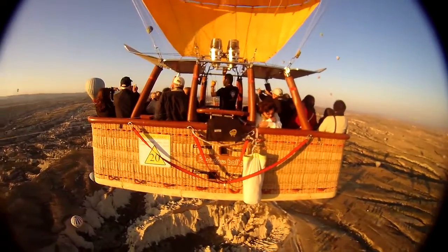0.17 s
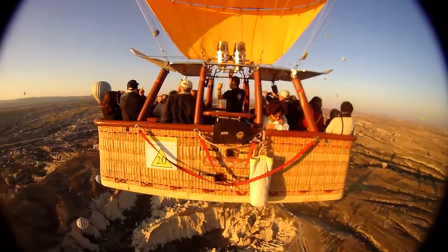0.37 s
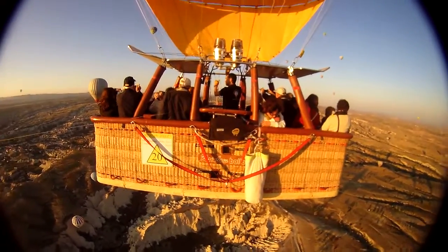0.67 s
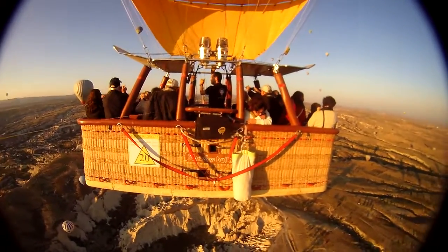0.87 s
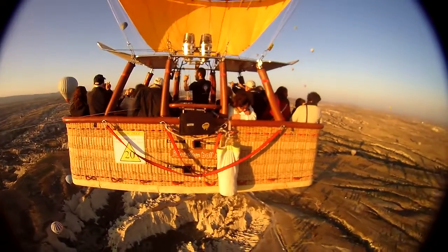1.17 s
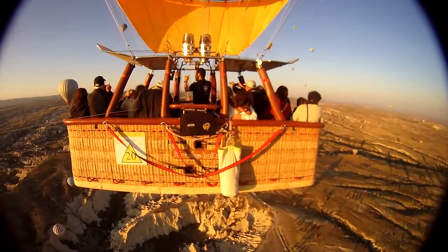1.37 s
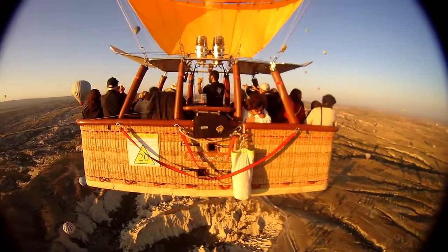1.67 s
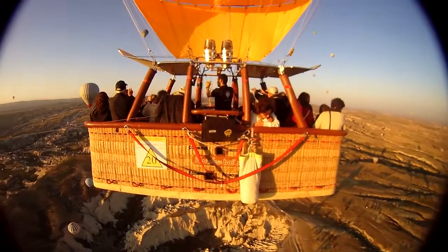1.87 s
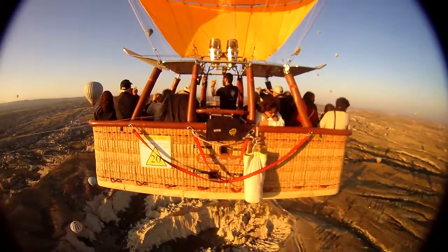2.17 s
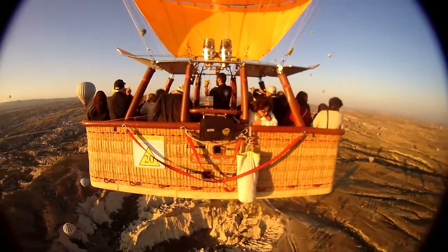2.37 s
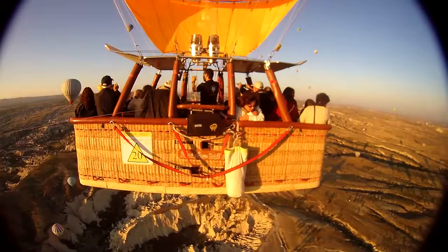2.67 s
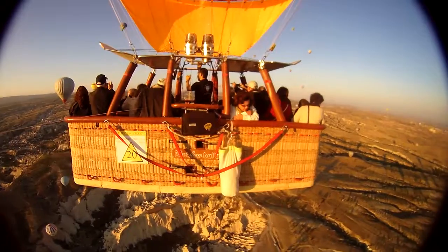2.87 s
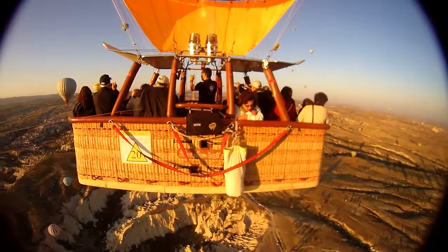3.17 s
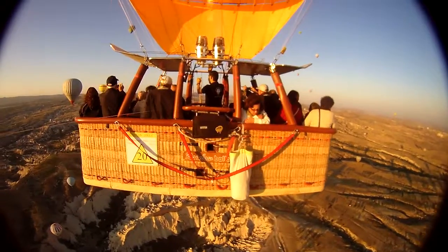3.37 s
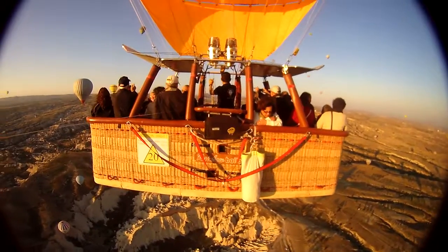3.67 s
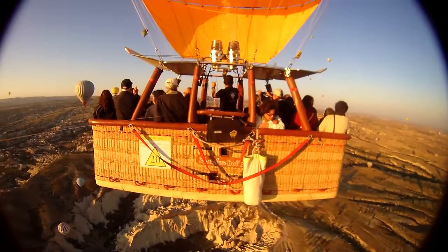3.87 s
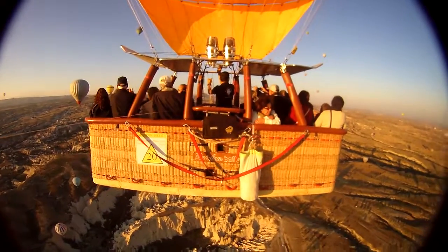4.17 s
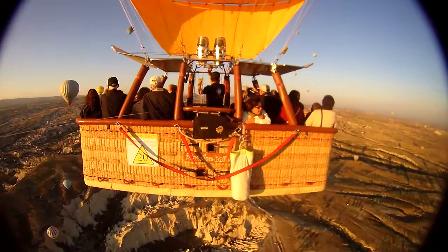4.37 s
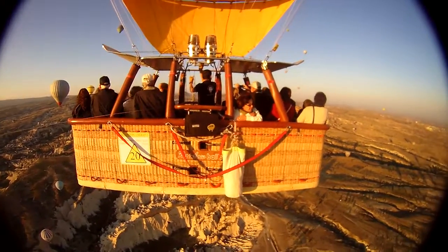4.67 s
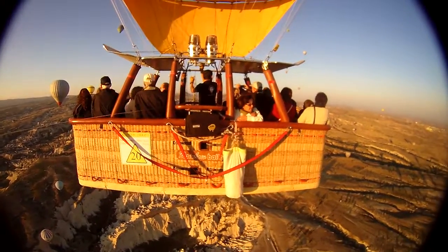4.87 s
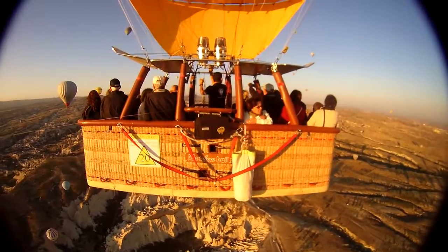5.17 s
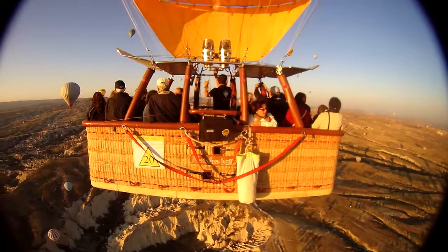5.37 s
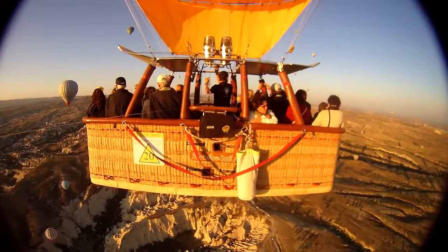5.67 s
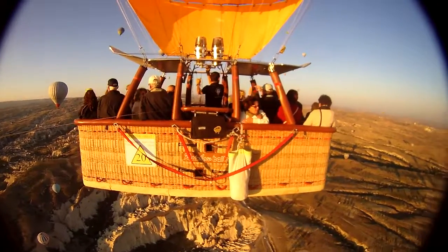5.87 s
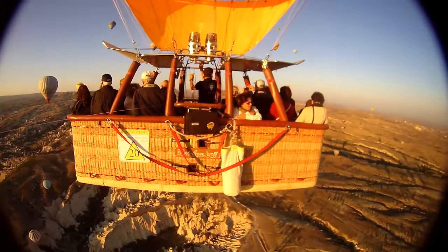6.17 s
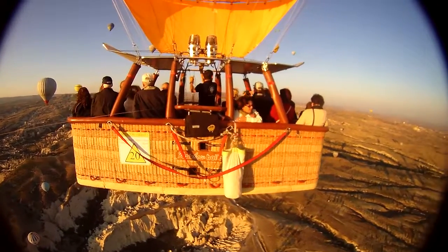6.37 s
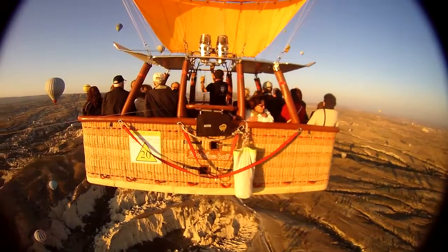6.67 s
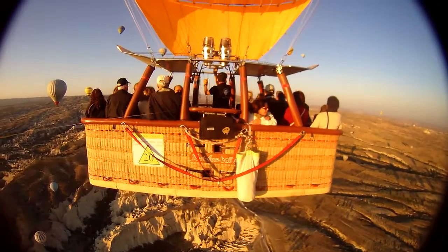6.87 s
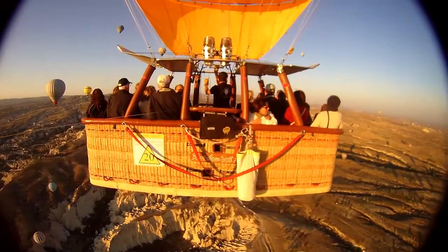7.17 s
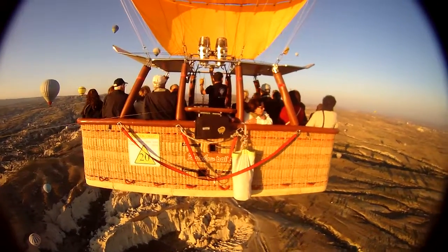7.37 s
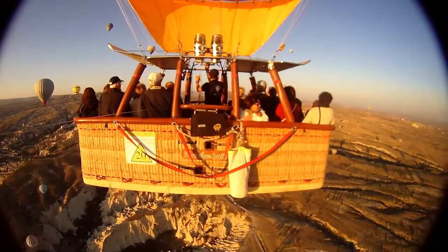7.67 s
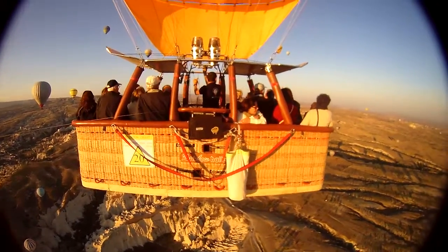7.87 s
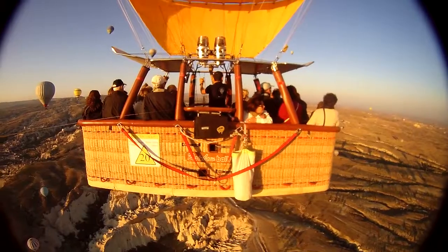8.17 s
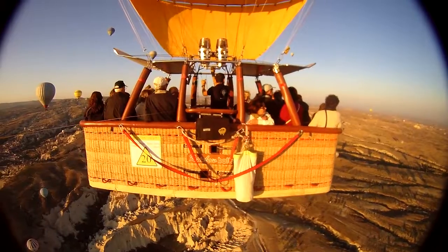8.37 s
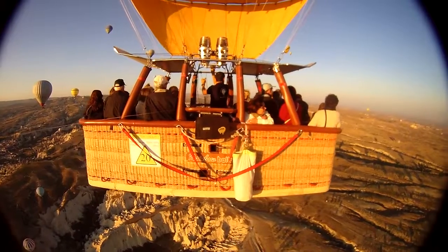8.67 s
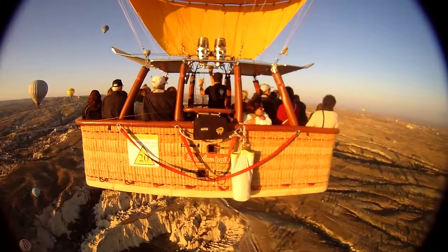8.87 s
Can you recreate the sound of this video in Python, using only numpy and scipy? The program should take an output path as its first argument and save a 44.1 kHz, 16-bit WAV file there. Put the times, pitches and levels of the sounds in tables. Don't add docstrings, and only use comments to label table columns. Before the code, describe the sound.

Continuous balloon burner noise heard through a sealed, muffling microphone case: heavy low rumbling, breathy mid roar and a subdued nozzle hiss. It flares in the first second, eases gently, dips briefly in hiss around the middle, and keeps billowing unevenly. Shortly before nine seconds it weakens and snaps off within a fraction of a second, leaving only a soft, low pilot flame puffing over very faint steady hiss, dry and outdoors.

```python
import sys
import numpy as np
from scipy import signal
from scipy.fft import rfft, irfft, next_fast_len
from scipy.io import wavfile
from scipy.ndimage import uniform_filter1d

SR = 44100
rng = np.random.default_rng(int(sys.argv[2]) if len(sys.argv) > 2 else 0)


def decibels_to_gain(level_db):
    exponent = np.asarray(level_db, float) / 20
    return 10 ** exponent


def digitize_waveform(pressure):
    field = np.atleast_2d(pressure).T
    bounded = np.clip(field, -1, 1)
    quanta = np.round(bounded * 32767).astype(np.int16)
    wavfile.write(sys.argv[1], SR, quanta)


N = 397251
TIME_S = np.arange(N) / SR

JET_FULL_DB = -49
CLOSE_S = 8.69


def noise():
    return rng.standard_normal(N)


def rms_one(x):
    return x / np.sqrt(np.mean(x ** 2) + 1e-20)


def drift(rate_hz):
    stride = 40
    pole = np.exp(-2 * np.pi * rate_hz * stride / SR)
    settling = 2000
    source = rng.standard_normal(N // stride + settling + 2)
    slow = signal.lfilter([1], [1, -2 * pole, pole * pole], source)[settling:]
    return np.interp(np.arange(N) / stride, np.arange(len(slow)), rms_one(slow))


def coloured(source, spectrum, cased=True):
    # (frequency [Hz], width [Hz], level [dB])
    case_modes = [(1158, 290, -4), (1316, 120, 1.5), (1763, 210, -4.5), (2160, 410, 1), (2300, 100, -1.5),
                  (2494, 210, 3), (2630, 150, -4), (2800, 130, 4), (2935, 105, -7.5), (4050, 183, -13.5),
                  (5500, 400, 1), (6140, 430, -6), (6780, 440, 4.5)]
    size = next_fast_len(N)
    hz = np.maximum(np.arange(size // 2 + 1) * SR / size, 1)
    points_hz, points_db = np.transpose(spectrum)
    level_db = np.interp(np.log(hz), np.log(points_hz), points_db, left=-90, right=-90)
    if cased:
        for mode_hz, width_hz, mode_db in case_modes:
            level_db = level_db + mode_db / (1 + (2 * (hz - mode_hz) / width_hz) ** 2)
    return rms_one(irfft(rfft(source, size) * decibels_to_gain(level_db), size)[:N])


def evened(x, window_s, share):
    window = int(window_s * SR)
    power = uniform_filter1d(uniform_filter1d(x ** 2, window), window)
    envelope = np.sqrt(power + 1e-9)
    return rms_one(x / envelope ** share)


def dying(start_s, db_per_s):
    return db_per_s * np.maximum(TIME_S - start_s, 0)


def valve_pressure():
    # (time [s], jet level [dB])
    valve = [(0, -49), (.35, -48), (1.3, -49), (2.3, -48.5), (3.3, -49), (4.1, -49), (4.45, -52),
             (4.65, -53.5), (4.95, -51), (5.4, -49), (5.65, -49), (6.0, -49), (7.85, -48), (8.1, -51),
             (8.25, -52), (8.35, -53.5), (8.7, -53.5), (9.01, -46)]
    time_s, jet_db = np.transpose(valve)
    return np.interp(TIME_S, time_s, jet_db)


def eddy_swells():
    # (time [s], swell of the rumble [dB], swell of the body [dB])
    eddies = [(.45, 4, 4.5), (.88, 1.5, -1), (1.32, 4.5, 2), (1.57, 6, 1.5), (1.77, 8, 4), (1.92, 2, 2.5),
              (2.01, 6, 1), (2.26, 5, 2), (2.52, 3, 2.5), (2.73, 2.5, 2.5), (3.0, 6.5, 1), (3.23, 2.5, 0),
              (3.42, 2, 3.5), (3.59, 4, -1.5), (3.77, 5.5, 2.5), (3.91, 6, 0), (4.15, 3, 0), (4.46, 5, 1.5),
              (4.98, 4, 0.5), (5.11, 4, -1.5), (5.53, 0.5, -2.5), (6.07, 5, -4.5), (6.26, 1, 0),
              (6.79, 7, 0), (6.93, 5.5, 0.5), (7.19, -5, 2), (7.48, 4.5, -0.5), (7.91, 2.5, -0.5),
              (8.38, -5, 2.5), (8.72, 4, 3.5)]
    half_length_s = 0.037
    centre_s, *heights_db = np.transpose(eddies)
    coarse_s = TIME_S[::64]
    bells = np.exp(-((coarse_s[:, None] - centre_s) / half_length_s) ** 2)
    return [np.interp(TIME_S, coarse_s, bells @ height_db) for height_db in heights_db]


def layer_db(law, end, pressure_db, swell_db):
    steady_db, start_db, flare_db, starve, lag_s = law
    shrink_db_per_s, linger_s, die_db_per_s = end
    flare_s, flare_width_s, settle_s, shrink_s = 0.6, 0.43, 6.1, 8.593
    starved_db, starve_power = 6, 3.1
    drop_db = np.maximum(JET_FULL_DB - pressure_db, 0)
    felt_db = starved_db * (drop_db / starved_db) ** starve_power
    lost_db = np.interp(TIME_S - lag_s, TIME_S, felt_db)
    flare = np.exp(-((TIME_S - flare_s) / flare_width_s) ** 2)
    settling_db = steady_db + start_db * np.exp(-TIME_S / settle_s)
    burning_db = settling_db + flare_db * flare + starve * lost_db + swell_db
    shrinking_db = dying(shrink_s, shrink_db_per_s)
    return burning_db - shrinking_db - dying(CLOSE_S + linger_s, die_db_per_s)


def flame(pressure_db):
    # (frequency [Hz], level [dB per Hz])
    rumble_colour = [(6, -13.5), (22, 0.5), (44, 2.5), (70, -4), (95, -8.5), (140, -22.5)]
    body_colour = [(60, -20.5), (95, 1.5), (120, -1.5), (220, -4), (320, -8), (450, -18), (650, -50)]
    roar_colour = [(280, -11.5), (420, -2), (600, -1), (1000, -3.5), (1400, -7), (1700, -11), (2100, -24.5)]
    # (steady [dB], extra at start [dB], flare [dB], change per lost pressure [dB/dB], lag [s])
    rumble_law = (-41, 4.5, 2, -1.36, 0.2)
    body_law = (-41, 4.5, 3, 0.53, 0)
    roar_law = (-48.5, 2.5, 1.8, 0.7, 0.24)
    # (shrinking [dB/s], lingering [s], decay [dB/s])
    rumble_end = (3, 0.067, 150)
    body_end = (73, 0.059, 140)
    roar_end = (22, .012, 160)
    deep_db, mid_db = eddy_swells()
    rumble_db = layer_db(rumble_law, rumble_end, pressure_db, deep_db)
    body_db = layer_db(body_law, body_end, pressure_db, mid_db)
    roar_db = layer_db(roar_law, roar_end, pressure_db, 0.16 * mid_db)

    turbulence = drift(6.4)
    rumble = evened(coloured(noise(), rumble_colour), 0.056, 0.86)
    rumble = decibels_to_gain(rumble_db + 0.28 * turbulence) * rumble
    body = evened(coloured(noise(), body_colour), 0.079, 0.7)
    body = decibels_to_gain(body_db + 0.47 * turbulence + 0.54 * drift(13.0)) * body
    body = body + 0.068 * (body ** 2 / decibels_to_gain(body_db) - decibels_to_gain(body_db))
    roar = evened(coloured(noise(), roar_colour), 0.037, 0.16)
    roar = decibels_to_gain(roar_db + 0.36 * turbulence + 0.3 * drift(4.7)) * roar
    return rumble + body + roar


def gas_jets(pressure_db):
    # (frequency [Hz], level [dB per Hz])
    hiss_colour = [(1500, -25), (1800, -9), (2050, -0.5), (2900, -6.5), (3100, -10.5), (3700, -16.5),
                   (4300, -34)]
    sizzle_colour = [(3300, -14.5), (3900, 2.5), (4400, 0.5), (5200, -10.5), (6400, -16.5), (9200, -18),
                     (10500, -25), (16000, -30)]
    full_sizzle_db, steepness = -69, 1.03
    jet_db = pressure_db - dying(CLOSE_S, 170)
    flutter = drift(5.4)
    hiss = decibels_to_gain(jet_db + 0.38 * flutter) * coloured(noise(), hiss_colour)
    easing_db = dying(8.42, 27)
    sizzle_db = full_sizzle_db + steepness * (jet_db - JET_FULL_DB) - easing_db
    sizzle_level = decibels_to_gain(sizzle_db + 0.35 * flutter + 0.45 * drift(5.0))
    return hiss + sizzle_level * coloured(noise(), sizzle_colour)


def pilot_flame():
    # (frequency [Hz], level [dB per Hz])
    pilot_colour = [(6, -16), (45, 3), (260, -8.5), (450, -21), (1050, -26), (1400, -20), (2800, -26),
                    (3400, -50)]
    return decibels_to_gain(-57 + 0.8 * drift(11.0)) * coloured(noise(), pilot_colour, cased=False)


def scene():
    pressure_db = valve_pressure()
    return (flame(pressure_db) + gas_jets(pressure_db) + pilot_flame())[None]


def roll_off(x):
    return signal.sosfilt(signal.butter(12, 15760, fs=SR, output="sos"), x)


def record(dry):
    hiss = decibels_to_gain(-79.5) * noise()
    return roll_off(dry + hiss)


dry = scene()
out = record(dry)
digitize_waveform(out)
```